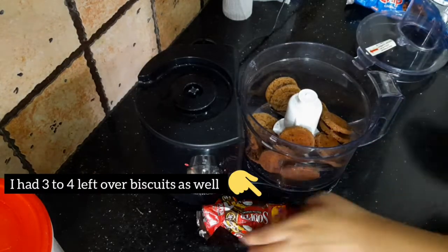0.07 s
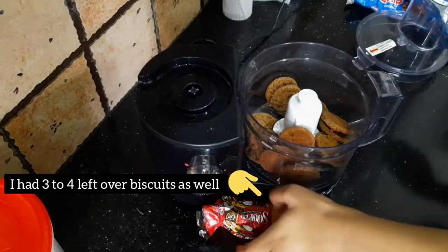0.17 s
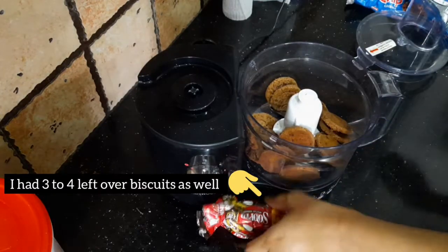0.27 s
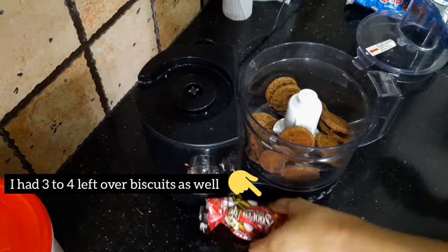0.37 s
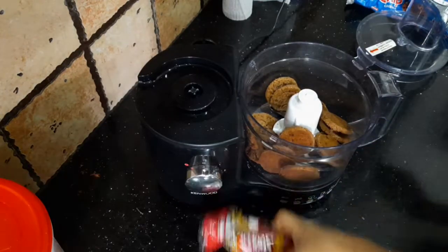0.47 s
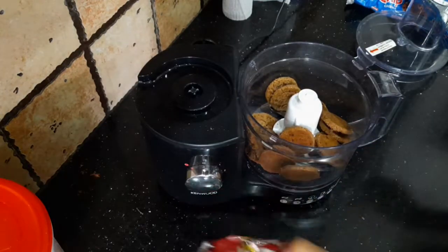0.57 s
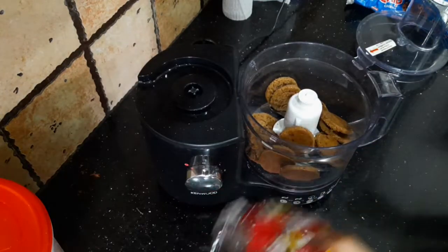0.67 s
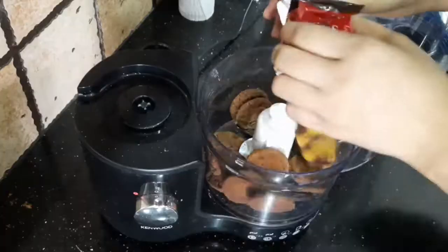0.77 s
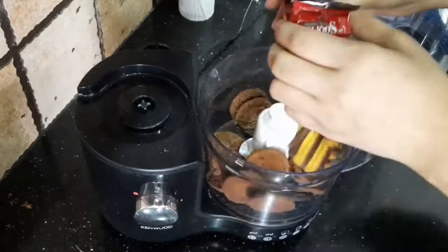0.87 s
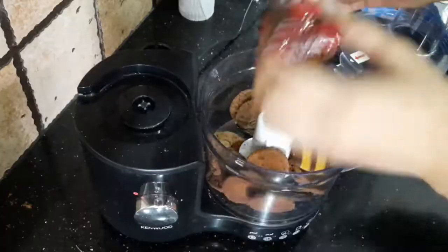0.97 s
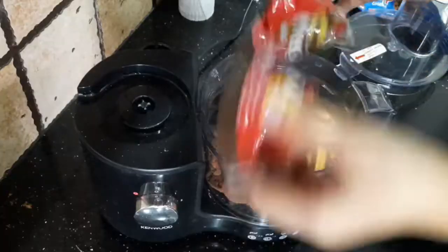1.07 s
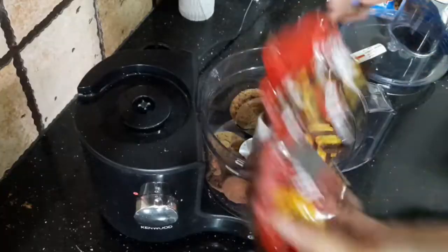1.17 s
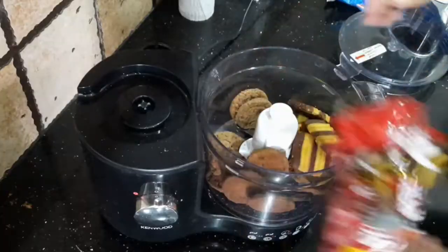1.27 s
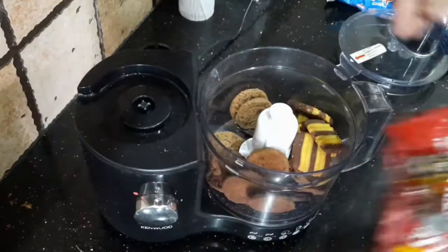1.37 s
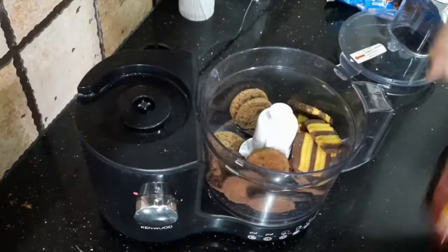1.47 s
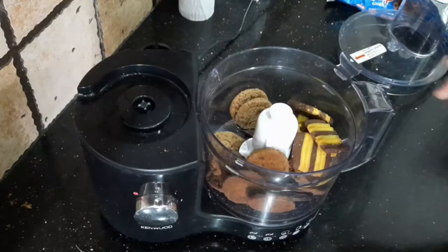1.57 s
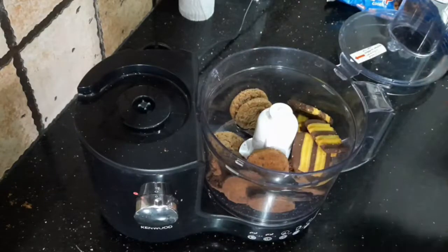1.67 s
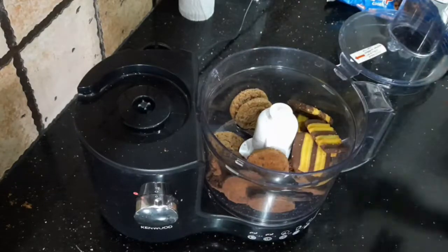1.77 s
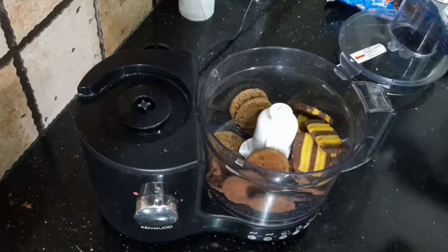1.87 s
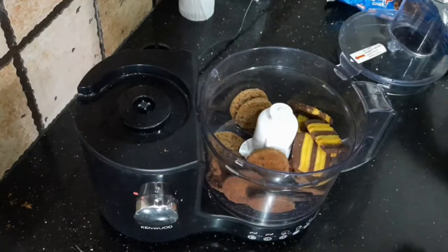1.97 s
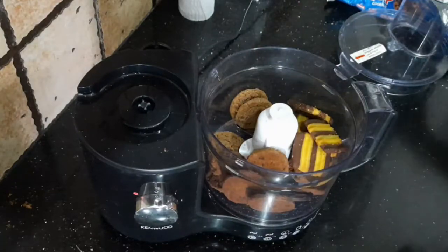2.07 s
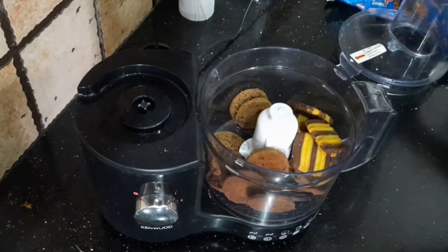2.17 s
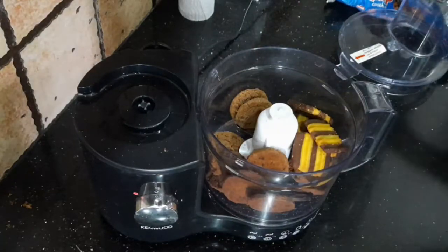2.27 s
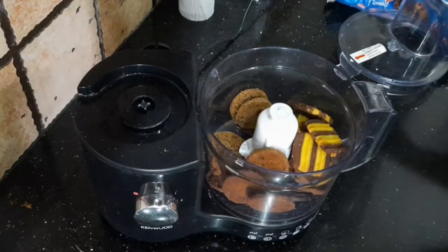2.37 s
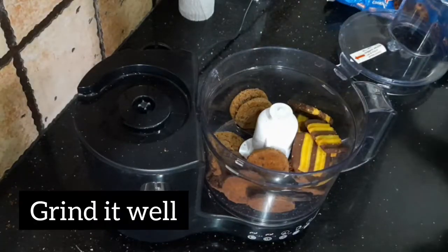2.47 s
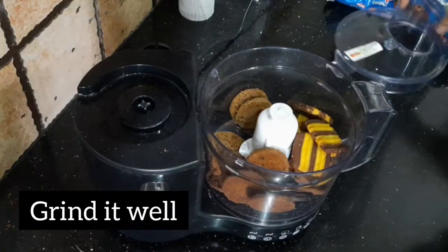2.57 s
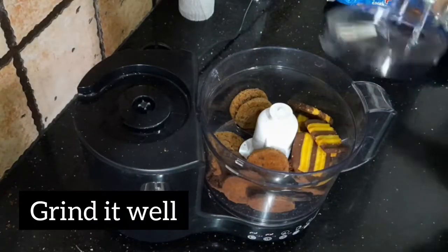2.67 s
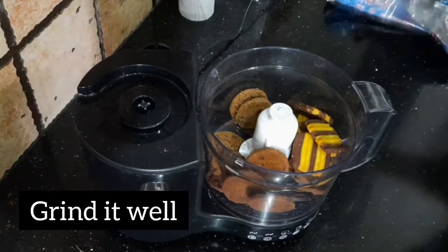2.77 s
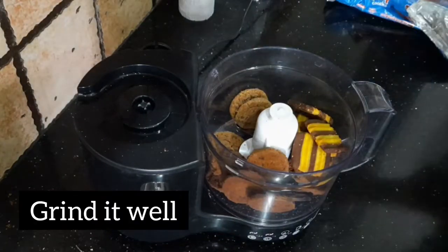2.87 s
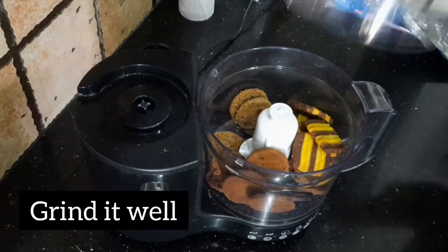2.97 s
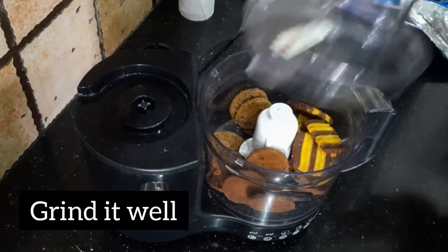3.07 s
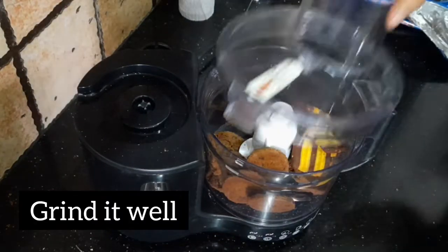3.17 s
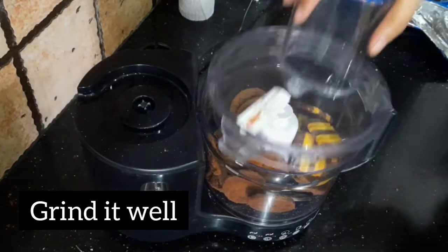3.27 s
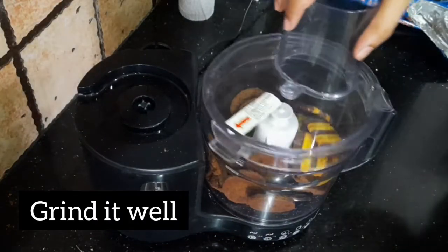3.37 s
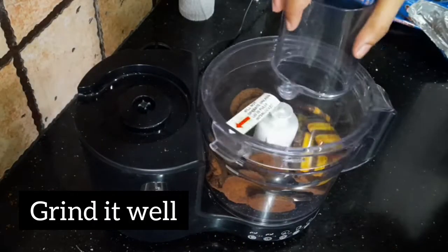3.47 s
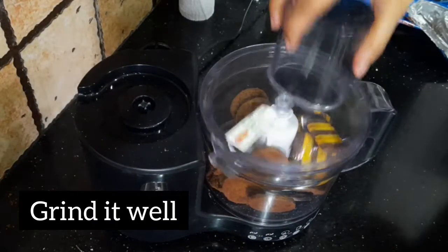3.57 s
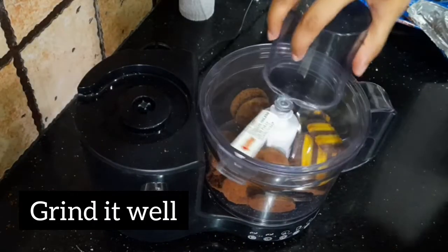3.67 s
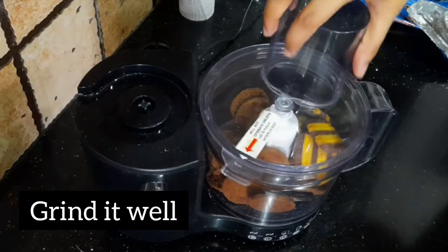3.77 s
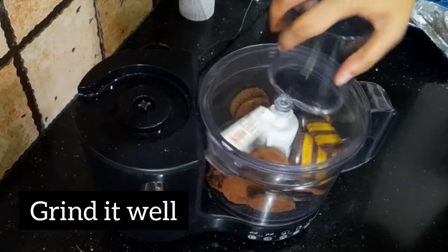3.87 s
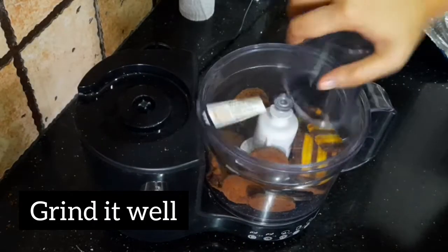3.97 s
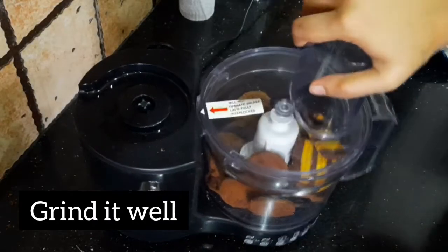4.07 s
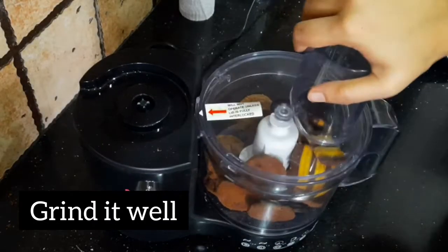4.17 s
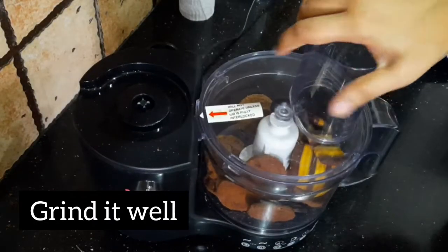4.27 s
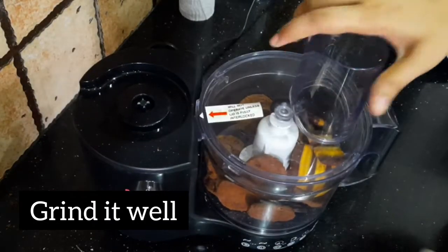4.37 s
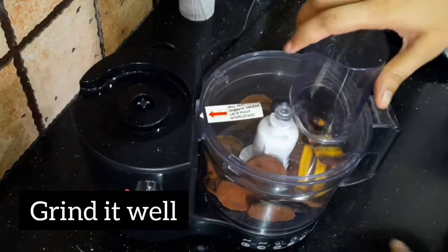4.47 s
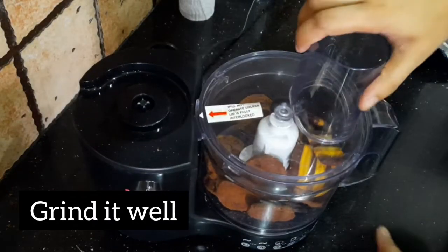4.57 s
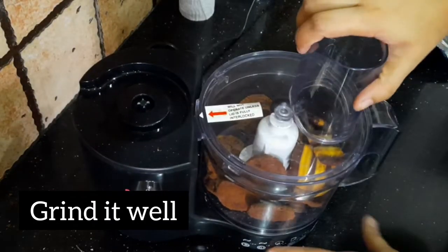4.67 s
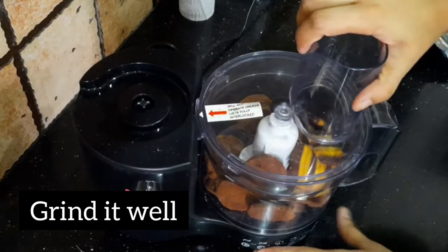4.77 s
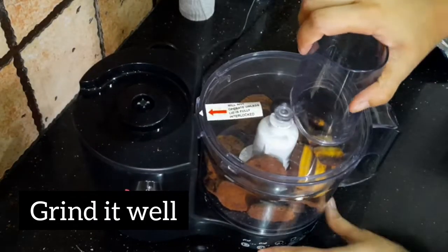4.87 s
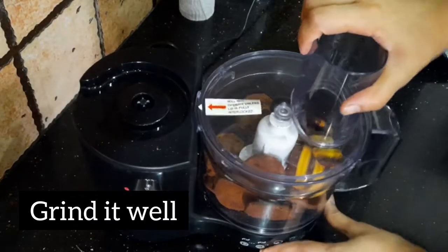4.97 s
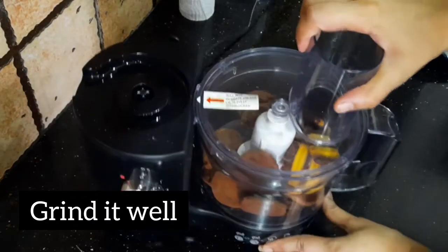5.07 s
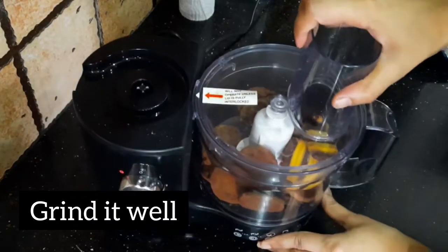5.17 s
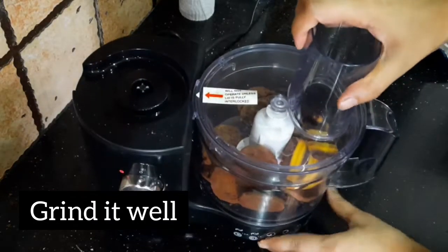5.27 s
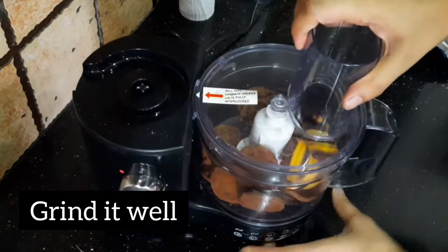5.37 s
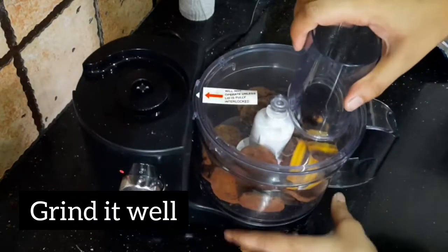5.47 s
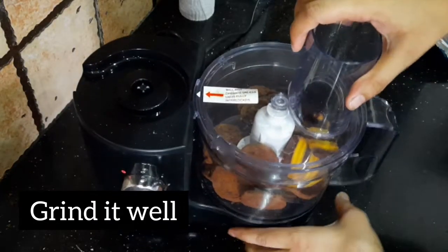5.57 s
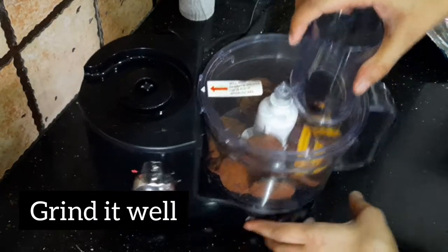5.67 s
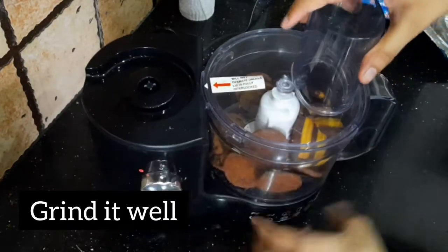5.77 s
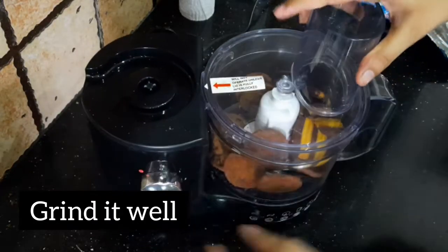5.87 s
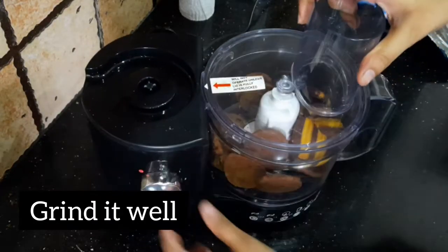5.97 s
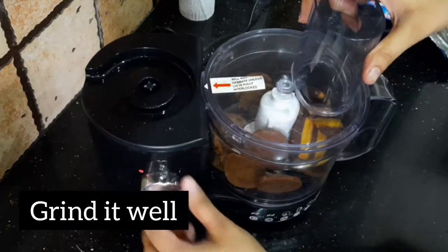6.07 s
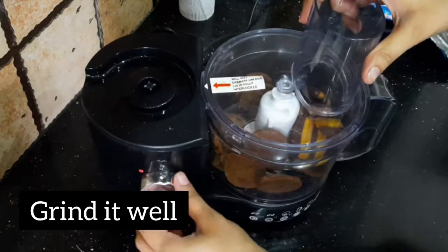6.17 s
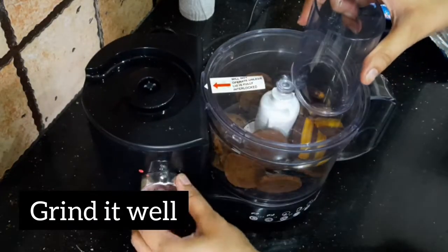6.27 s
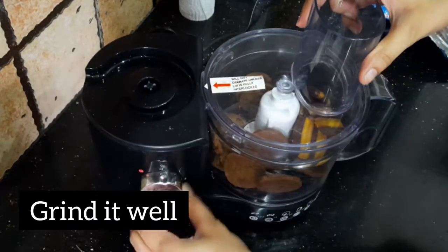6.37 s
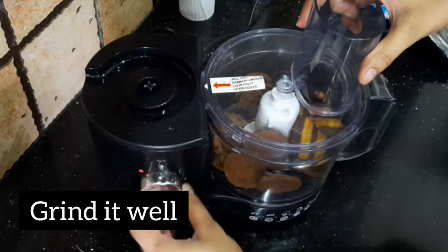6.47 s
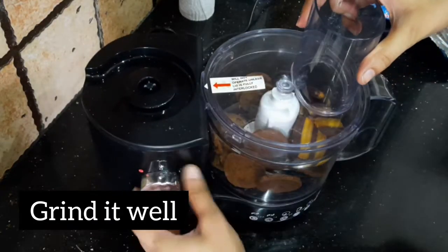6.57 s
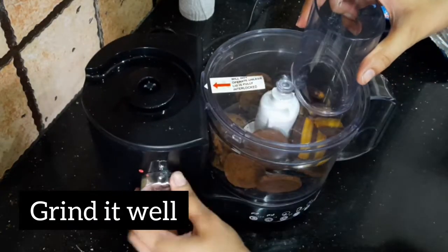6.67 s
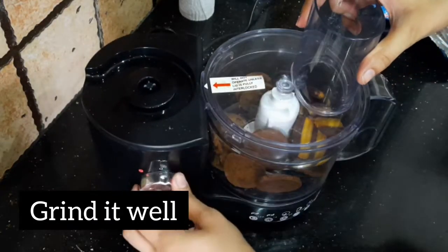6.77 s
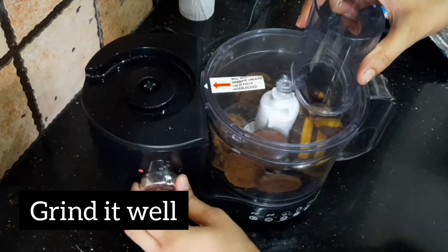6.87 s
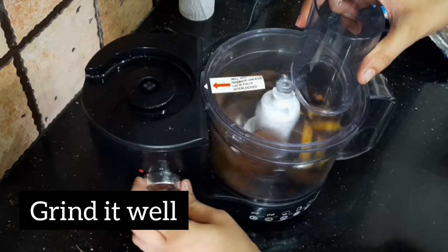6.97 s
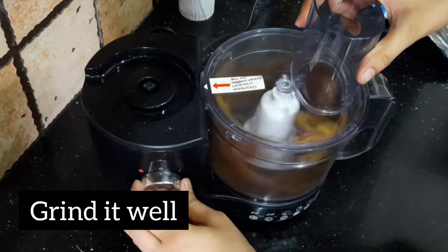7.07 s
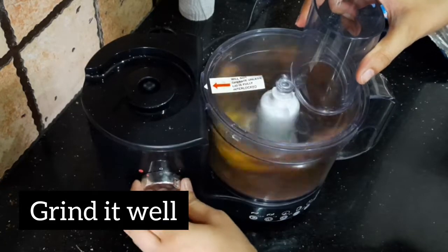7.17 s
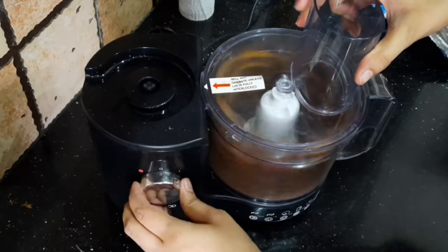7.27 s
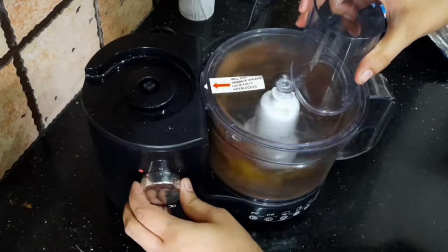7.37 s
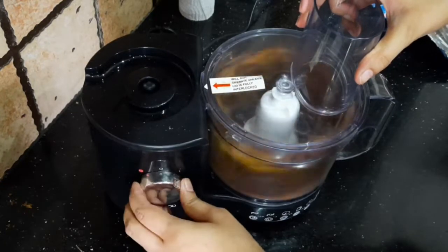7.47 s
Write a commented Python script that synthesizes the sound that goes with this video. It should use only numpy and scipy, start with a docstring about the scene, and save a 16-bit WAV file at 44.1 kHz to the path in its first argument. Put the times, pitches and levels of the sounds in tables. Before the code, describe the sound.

Foil wrapper crackles, biscuits clatter into a plastic bowl, a lid knocks and thuds into place, then a processor motor whines up, chopping noisily.

```python
"""A food processor on a kitchen counter: its motor runs up with a rising whine while the blade chops biscuits.
First a foil packet is picked up, the biscuits tumble into the plastic bowl and the wrapper is crumpled away.
Then the lid is knocked onto the bowl and twisted until it locks. A phone listens from close above.
The whine is a set of sine waves tied to the shaft; blows are short noise plus ringing modes;
foil, crumbs, rubbing and the airy background are coloured noise, and a tiled room adds a short echo."""
import sys
import numpy as np
from scipy import signal
from scipy.fft import rfft, irfft
from scipy.io import wavfile
from scipy.ndimage import uniform_filter1d

SR = 44100
rng = np.random.default_rng(int(sys.argv[2]) if len(sys.argv) > 2 else 0)


def master(y):
    """Save y as 16-bit WAV."""
    cut = np.clip(np.atleast_2d(y).T, -1, 1)
    pcm = np.round(cut * 32767)  # scale
    wavfile.write(sys.argv[1], SR, pcm.astype(np.int16))


N = 331632

# ringing modes of bowl and lid, before each blow varies them: (frequency [Hz], level [dB], ring time t60 [s])
BOWL_MODES = [(146.4, -1.5, 0.47), (186, 0, 0.17), (285, 0, 0.1), (306, 1.5, 0.18), (343, 6.5, 0.15),
              (380, -8, 0.25), (423, -2.5, 0.16), (456.7, -6.5, 0.19), (623.5, 1, 0.19), (782, 1, 0.052),
              (857.5, 1, 0.11), (933, 0, 0.074), (1120, -9.5, 0.2), (1282, -16.5, 0.32),
              (1430, -27.5, 0.15), (1710, -6.5, 0.15), (2104, -8, 0.23), (2340, -4.5, 0.1),
              (2530, -12.5, 0.09), (2653, -5.5, 0.048), (3770, -9, 0.11)]
# ranges of thump, body, knock, clack and tick; each blow type scales the noise time and shifts the balance:
# (low edge [Hz], high edge [Hz], t60 of the contact noise [s], modes over noise [dB])
REGISTERS = [(159.7, 292, 0.1, -0.5), (277, 483, 0.051, 2.5), (467, 1476, 0.18, 1.5),
             (1375, 4100, 0.081, -4.5), (4460, 14500, 0.062, -41.5)]
# spectrum of rustling foil, also used for rubbing plastic: (frequency [Hz], level [dB])
FOIL_SPECTRUM = [(90, -43), (330, 12), (900, 4.5), (2200, 4.5), (4000, 0.5), (6500, -3), (10000, -4.5),
                 (14000, -2.5), (16000, -12)]


def undb(db):
    """Decibels to gain."""
    return 10 ** (np.asarray(db) / 20)


def over_hz(points, size):
    """Read a frequency table at the bins of a transform."""
    hz, value = np.transpose(points)
    bin_hz = np.fft.rfftfreq(size, 1 / SR)
    return np.interp(np.log(bin_hz + 1), np.log(hz), value)


def colour(x, points):
    """Shape a sound with a (Hz, dB) spectrum."""
    size = x.shape[-1]
    return irfft(rfft(x) * undb(over_hz(points, size)), size)


def unit(x):
    """Scale to an rms (average strength) of 1."""
    return x / np.sqrt(np.mean(x ** 2))


def band(x, low_hz, high_hz, order=3):
    """Keep only the sound between two frequencies."""
    edges = [low_hz, min(high_hz, SR / 2 - 1)]
    return signal.sosfilt(signal.butter(order, edges, "band", fs=SR, output="sos"), x)


def fade(t, t60):
    """Exponential decay, 60 dB down after t60 seconds."""
    return np.exp(-np.log(1000) * t / t60)


def burst(t, rise, t60):
    """A contact builds up briefly and dies away."""
    return (1 - np.exp(-t / rise)) * fade(t, t60)


def noise(size):
    """White noise at two microphones: alike in the bass, nearly unrelated in the treble."""
    # likeness of the two microphones: (frequency [Hz], correlation [0 to 1])
    likeness_table = [(60, 1), (300, 0.66), (900, 0.09), (2200, 0.046), (6000, 0.028)]
    likeness = np.clip(over_hz(likeness_table, size), 0, 1)
    mid, side = rfft(rng.standard_normal((2, size)))
    mid = mid * np.sqrt(1 + likeness)
    side = side * np.sqrt(1 - likeness)
    return unit(irfft([mid + side, mid - side], size))


def walk(rate):
    """Smooth random wander with rms 1, taking a new value `rate` times a second."""
    hold = max(int(SR / rate), 1)
    steps = np.repeat(rng.standard_normal(N // hold + 1), hold)[:N]
    return unit(uniform_filter1d(steps, hold))


def add(out, s, x):
    """Mix a short sound in at time s [s]."""
    start = int(s * SR)
    out[:, start:start + x.shape[1]] += x[:, :N - start]


def pan(x, left_db):
    """Move a sound towards the left microphone."""
    return x * undb(np.array([[1], [-1]]) * left_db / 2)


def strokes(rows, attack_s, release_s):
    """Envelope of movements: each swells, holds for its length and dies away."""
    t = np.arange(N) / SR
    envelope = 0
    for s, length, db in rows:
        before = np.maximum(s - t, 0)
        after = np.maximum(t - s - length, 0)
        envelope = envelope + undb(db) * np.exp(-before / attack_s - after / release_s)
    return envelope


def touch(voice_db, force_db, hardness, weight_db=0):
    """Harder contact tilts a blow to the treble; weight behind it adds thump and shortens the ring."""
    hand_damping = 0.37  # a leaning hand damps the plastic: dB of ring time lost per dB of weight
    octaves = np.log2([np.sqrt(low * high) / 1000 for low, high, *_ in REGISTERS])  # from 1 kHz
    is_thump = np.arange(len(REGISTERS)) == 0
    levels = force_db + np.array(voice_db) + hardness * octaves + weight_db * is_thump
    return levels, undb(-hand_damping * weight_db)


def blows(rows, voice_db, resonances, ring_db, contact):
    """Each blow is a burst of contact noise plus ringing modes, weighted by where it lands."""
    # spectrum of the contact noise: (frequency [Hz], level [dB])
    shell = [(900, 5), (1400, 1.5), (2600, 0.5), (3200, -6), (3900, -9.5), (6000, -19), (10000, -26.5)]
    out, t = np.zeros((2, N)), np.arange(SR // 2) / SR
    hz, mode_db, t60 = np.transpose(resonances)[:, :, None]
    attack = SR // 50  # the first 20 ms set the level
    for s, *blow in rows:
        levels, sustain = touch(voice_db, *blow)
        place, detune, left, right = rng.standard_normal((4, len(resonances), 1))
        modes = undb(mode_db + 2 * place) * fade(t, t60 * sustain)
        angle = 2 * np.pi * hz * (1 + 0.0062 * detune) * t
        # higher modes reach the two microphones further out of step
        ring = np.array([np.sum(modes * np.sin(angle + lag * np.sqrt(hz / 2200)), 0) for lag in (left, right)])
        rub = colour(noise(len(t)), shell)
        for db, (low_hz, high_hz, rub_t60, share_db) in zip(levels, REGISTERS):
            crack = band(rub * burst(t, rise=0.0013, t60=rub_t60 * contact), low_hz, high_hz)
            crack = crack / crack[:, :attack].std()
            tone = band(ring, low_hz, high_hz)
            tone = tone / tone[:, :attack].std()
            hit = crack + undb(share_db + ring_db) * tone
            add(out, s, undb(db) * hit / hit[:, :attack].std())
    return out


def motor_whine(running_s):
    """Sine waves at multiples of the shaft rate rise in pitch and level as the motor gains speed."""
    # motor lines, each fluttering in level; the twelfth is the armature slots passing:
    # (multiple of the shaft rate, level [dB])
    orders = [(1, -5), (3, -7), (10.6, -6), (12, 3.5), (24, -8)]
    final_shaft_hz, run_up_s = 205.8, 0.143  # run_up_s is a time constant
    whine_db, whine_growth = -39.5, 1.3  # level at full speed; power of the speed with which it grows
    speed = 1 - np.exp(-running_s / run_up_s)
    shaft_hz = final_shaft_hz * speed * (1 + 0.017 * walk(300))  # uneven load
    angle = 2 * np.pi * np.cumsum(shaft_hz) / SR
    lines = 0
    for multiple, db in orders:
        # the jolting load shakes the high lines most, differently towards each microphone
        shake = min(multiple / 10, 1) * np.array([walk(110), walk(110)])
        flutter_db = 2.2 * walk(70)
        lines = lines + undb(db + flutter_db) * np.sin(multiple * angle + shake)
    return undb(whine_db) * speed ** whine_growth * lines


def chopping(running_s):
    """The loaded housing rumbles and crumbs spray against the wall, easing as the biscuits break up."""
    # spectra of the housing and of the crumbs: (frequency [Hz], level [dB])
    housing_spectrum = [(40, -31), (130, -15), (230, -4), (290, 2), (340, 19), (420, 1), (520, -4),
                        (750, -9), (1100, -13.5), (1600, -40), (4000, -39.5)]
    crumb_spectrum = [(300, -34.5), (900, -1.5), (1500, -4.5), (2200, -4.5), (3200, -3.5), (5000, -8.5),
                      (7000, -11.5), (10000, -13), (14000, -11), (16000, -24)]
    bite_delay_s, bite_rise_s = 0.039, 0.0092  # the blade bites a moment after switch-on
    whole_biscuit_db, break_up_s = 5.5, 0.16  # extra load at first, and how fast it eases
    rumble_db, spray_db = -33, -37.5  # levels once the load has eased
    bite = (running_s > 0) * (1 + np.tanh((running_s - bite_delay_s) / (2 * bite_rise_s))) / 2
    load = bite * undb(whole_biscuit_db * np.exp(-running_s / break_up_s))
    housing = unit(colour(noise(N), housing_spectrum)) * undb(3.8 * walk(25))
    crumbs = unit(colour(noise(N), crumb_spectrum)) * undb(1.4 * walk(600))
    return load * (undb(rumble_db) * housing + undb(spray_db) * crumbs)


def processor():
    """The motor starts and the chopping sets in a moment later, with blows of the drive and blade."""
    # the drive engages and the blade strikes whole biscuits: (time [s], force [dB], hardness [dB per octave])
    chops = [(6.918, -44.5, -1.5), (6.947, -36, -4.5), (6.987, -36, -1.8), (7.028, -36, -4),
             (7.052, -31, 1.5), (7.16, -34.5, -4.5), (7.208, -30, 0), (7.254, -37, -2), (7.325, -37, 1.8),
             (7.453, -38, -6.5)]
    # what these blows bring out of thump, body, knock, clack and tick: (level [dB])
    chop_voice_db = [-20, -2, -3, -1.5, -10]
    switch_on_s = 6.912
    running_s = np.maximum(np.arange(N) / SR - switch_on_s, 0)
    strikes = blows(chops, chop_voice_db, BOWL_MODES, ring_db=-4.5, contact=0.58)
    return motor_whine(running_s) + chopping(running_s) + strikes


def lid():
    """The lid pings when picked up, knocks, scrapes along the rim and seats with a thud in the counter."""
    # set on the bowl, seated and locked:
    # (time [s], force [dB], hardness [dB per octave], weight behind it [dB])
    knocks = [(3.303, -18.5, -2.44, -11.5), (3.328, -26.5, -0.2, -1.5), (3.402, -29.5, 1.74, 4),
              (3.453, -34, -2.5, -14.5), (3.505, -30, -0.2, -8), (3.568, -17.5, 1.46, 3),
              (3.589, -15, 0.9, 4), (3.679, -30.5, -0.6, -2), (3.949, -33.5, 0.5, 4.5),
              (3.983, -31.5, 1.7, -0.5), (4.003, -27.5, -2, 5), (4.017, -29.5, -2.5, -3),
              (4.141, -48.5, 1, 4), (4.236, -40.5, -1, 11.5), (4.742, -50.5, -4.5, 3), (4.774, -52, 2, -3),
              (4.841, -32, -4, 2), (4.937, -42, 4, 7), (4.973, -28.5, -1, -3.5), (5.873, -44, 0, 4),
              (6.725, -51, 0, 1.5)]
    # what these blows bring out of thump, body, knock, clack and tick: (level [dB])
    lid_voice_db = [-7.5, 3.5, -1, -3, -12]
    # the lid sliding on the rim: (time [s], length [s], level [dB])
    scrapes = [(3.36, 0.27, -46.5), (3.6, 0.06, -43), (3.7, 0.24, -53.5), (4.945, 0.04, -41)]
    out = blows(knocks, lid_voice_db, BOWL_MODES, ring_db=-1.5, contact=0.71)
    t = np.arange(SR // 2) / SR
    ping = np.sin(2 * np.pi * 985 * t) + band(noise(len(t)), 270, 910, order=2) * 6.5
    add(out, 2.508, undb(-36) * ping * fade(t, t60=0.21))
    thud = unit(band(noise(len(t)), 72, 125, order=2)) * burst(t, rise=0.004, t60=0.3)
    add(out, 3.59, undb(-32) * thud)
    scrape = unit(band(colour(noise(N), FOIL_SPECTRUM), 300, 11000, order=1))
    scrape = scrape * undb(2 * walk(200))  # uneven rubbing
    return pan(out + scrape * strokes(scrapes, attack_s=0.008, release_s=0.035), left_db=0.4)


def biscuits():
    """Biscuits land in the bowl, and each blow rings both the plastic and the hard biscuit."""
    # landings: (time [s], force [dB], hardness [dB per octave])
    drops = [(0.684, -42, -7), (0.727, -35.5, -6), (0.754, -21.5, 0.9), (0.802, -26.5, -2.5),
             (0.843, -31.5, -1.3), (0.864, -31.5, 0), (1.107, -40.5, 4)]
    # what these blows bring out of thump, body, knock, clack and tick: (level [dB])
    drop_voice_db = [-19.5, -4, -1, 0.5, -15.5]
    # ringing modes of a hard biscuit: (frequency [Hz], level [dB], ring time t60 [s])
    biscuit_modes = [(1121, -1.5, 0.25), (2087, 11, 0.054), (3326, 8.5, 0.022)]
    return blows(drops, drop_voice_db, BOWL_MODES + biscuit_modes, ring_db=6.5, contact=1.0)


def crackle(rate, spread_db, t60):
    """Envelope of many tiny fractures a second, most of them weak and a few strong."""
    chance = rng.random(N)
    size = np.minimum(rng.exponential(size=N), 4)
    energy = (chance < rate / SR) * undb(spread_db * size) ** 2
    return unit(np.sqrt(signal.lfilter([1], [1, -fade(1 / SR, t60) ** 2], energy)))


def crackly_ticks_and_rustle():
    """Short jerky noise bursts, mostly creases snapping in the foil wrapper, above its fine rustle."""
    # short crackly ticks: mostly creases buckling, also a biscuit drop and a lid click:
    # (time [s], crack level [dB], sizzle over crack [dB])
    ticks = [(0.32, -33, -14), (0.364, -31, 8), (0.398, -29, -1.5), (0.45, -37.5, -0.5),
             (0.581, -33.5, 0.5), (0.597, -38, 7.5), (0.671, -28.5, -1), (0.843, -36, 5.5),
             (0.888, -40.5, 6), (0.985, -56.5, 16.5), (1.044, -34.5, 6), (1.159, -39, -5),
             (1.201, -35.5, -4.5), (1.286, -42, 7.5), (1.349, -42.5, 1), (1.436, -47.5, 8.5),
             (1.491, -42.5, 4), (1.598, -36.5, 3.5), (1.655, -26, 2.5), (1.763, -40, 3.5),
             (1.968, -48.5, 3), (2.065, -41, -5), (2.119, -44.5, 0.5), (2.561, -48.5, 7),
             (5.963, -49, -4.5)]
    # the hand grips and crumples the foil: (time [s], length [s], rustle level [dB])
    grips = [(0.335, 0.064, -34.5), (0.715, 0.15, -37), (1.08, 0.025, -45), (1.645, 0.037, -33),
             (2.11, 0.084, -54.5)]
    # between grips the foil keeps creeping back: (time [s], length [s], rustle level [dB])
    creep = [(0.358, 2.266, -54)]
    handling = strokes(grips, attack_s=0.034, release_s=0.02) + strokes(creep, attack_s=0.016, release_s=0.068)
    rustle = unit(colour(noise(N), FOIL_SPECTRUM))
    out = rustle * crackle(rate=450, spread_db=2.5, t60=0.041) * handling
    t = np.arange(SR // 8) / SR
    attack = SR // 125  # the first 8 ms set the level
    for s, crack_db, sizzle_db in ticks:
        # each tick comes in jerks, about 700 random steps a second
        jerks = undb(2.9 * np.repeat(rng.standard_normal(len(t)), SR // 700)[:len(t)])
        tick = colour(noise(len(t)), FOIL_SPECTRUM) * burst(t, rise=0.00046, t60=0.058) * jerks
        crack = band(tick, 716, 4600)
        sizzle = band(tick, 4500, 17000)
        add(out, s, undb(crack_db) * crack / crack[:, :attack].std())
        add(out, s, undb(crack_db + sizzle_db) * sizzle / sizzle[:, :attack].std())
    return out


def rubbing():
    """Faint hisses of rubbing, made of high noise: the lid being twisted, then softer brushes."""
    # hisses: (time [s], length [s], level [dB])
    rubs = [(3.87, 0.11, -48.5), (4.28, 0.15, -71), (6.02, 0.08, -64), (6.37, 0.05, -66.5),
            (6.66, 0.08, -66)]
    hiss = unit(band(colour(noise(N), FOIL_SPECTRUM), 3500, 16000, order=1))
    return hiss * strokes(rubs, attack_s=0.03, release_s=0.05)


def tiles(x, wet_db, t60, treble_t60, gap_s):
    """The tiled walls answer with a short bright tail of fading noise."""
    t = np.arange(SR) / SR
    tail = noise(SR)
    low_tail = band(tail, 80, 5600, order=1) * fade(t, t60)
    treble_tail = band(tail, 4000, 17000, order=1) * fade(t, treble_t60)
    # silent for gap_s, then fully in after as long again
    tail = (low_tail + treble_tail) * np.clip(t / gap_s - 1, 0, 1)
    tail = unit(tail) / np.sqrt(SR)
    # in the bass both microphones share one field; in the treble each has its own
    bass = colour(x, [(500, 0), (1500, -30)])
    field = x - bass + bass.mean(0)
    return undb(wet_db) * signal.fftconvolve(field, tail, axes=1)[:, :N]


def background():
    """Low airy noise with a drone of narrow noise bands; the level dips briefly and later drops and stays low."""
    # spectrum of the air: (frequency [Hz], level [dB])
    air_spectrum = [(15, -31.5), (25, -56.5), (53, -3.5), (99, -3), (217, -11.5), (242, -11.5), (270, -5),
                    (335, -1.5), (489, -13.5), (575, -8), (714, -14.5), (1700, -20.5), (3620, -33),
                    (12500, -49), (16000, -53.5)]
    # noise bands of the drone: (frequency [Hz], width [Hz], level [dB])
    drone_bands = [(255.1, 5, -56), (292.6, 14.4, -52.5), (339.2, 19, -52)]
    dip_at_s, dip_half_s, dip_db = 4.47, 0.34, -4.5  # brief dip in level: middle, half length, depth
    drop_at_s, drop_db = 6.795, -13.5  # lasting drop in level
    t = np.arange(N) / SR
    air = unit(colour(noise(N), air_spectrum)) * undb(-45.5 + 1.4 * walk(6))
    drone = 0
    for hz, width, db in drone_bands:
        drone = drone + undb(db) * unit(band(noise(N), hz - width / 2, hz + width / 2, order=2))
    dip = np.exp(-((t - dip_at_s) / dip_half_s) ** 2)
    return (air + drone) * undb(dip_db * dip + drop_db * (t > drop_at_s))


def scene():
    """Everything on the counter, its echo and the background."""
    counter = processor() + lid() + biscuits() + crackly_ticks_and_rustle() + rubbing()
    echo = tiles(counter, wet_db=-9.5, t60=0.66, treble_t60=0.31, gap_s=0.0022)
    return counter + echo + background()


def record(dry):
    """The phone leans to the left, rounds off the loudest peaks and cuts the top."""
    # the left microphone is nearer: (frequency [Hz], left minus right [dB])
    lean_table = [(80, 4), (300, 1), (700, 5.5), (2000, 3.5), (16000, 2.5)]
    top_hz = 16200
    lean = undb(np.array([[1], [-1]]) * over_hz(lean_table, N) / 2)
    lean = lean / np.sqrt(np.mean(lean ** 2, 0))  # keeps the gain of the pair at 1 on average
    heard = np.tanh(irfft(rfft(dry) * lean, N))
    return signal.sosfilt(signal.ellip(10, 0.2, 70, top_hz, fs=SR, output="sos"), heard)


dry = scene()
out = record(dry)
master(out)
```